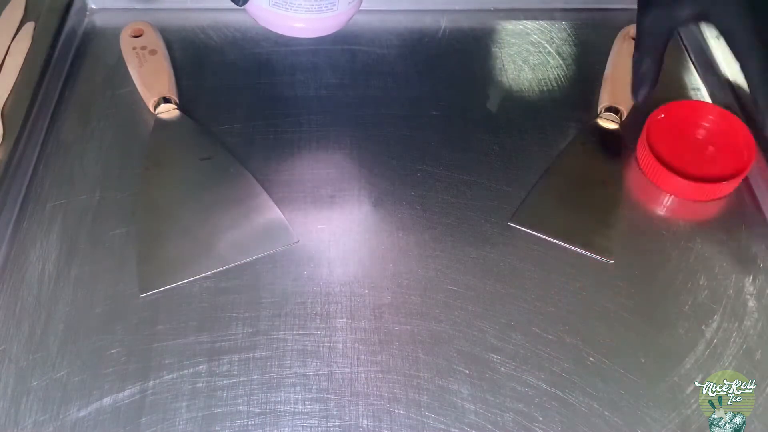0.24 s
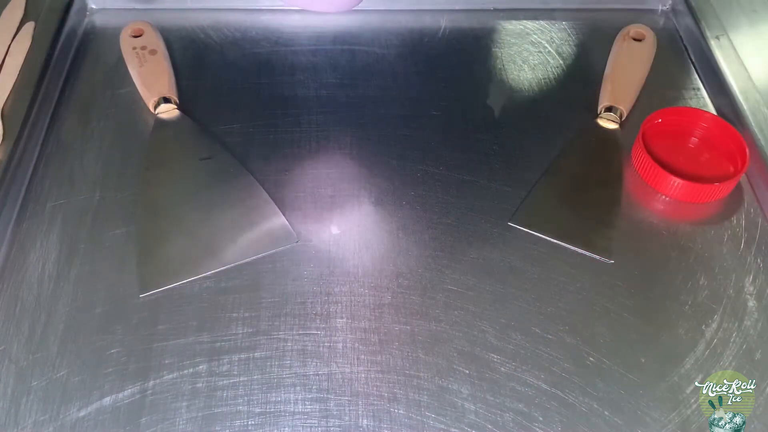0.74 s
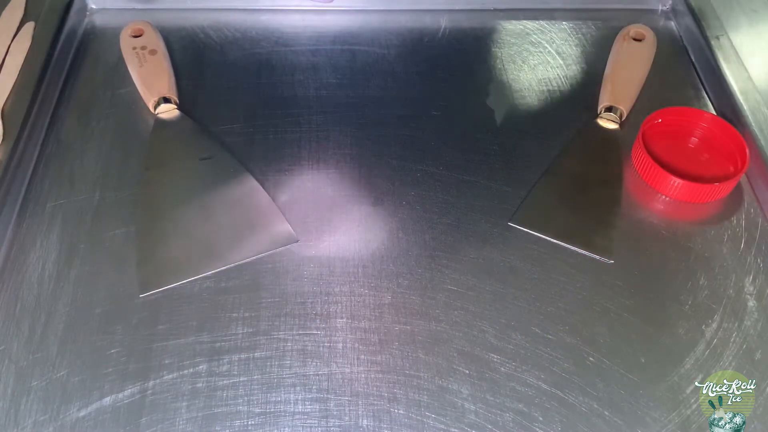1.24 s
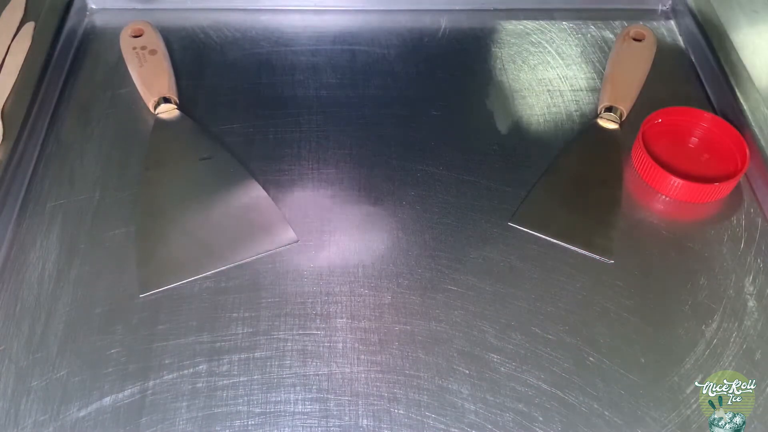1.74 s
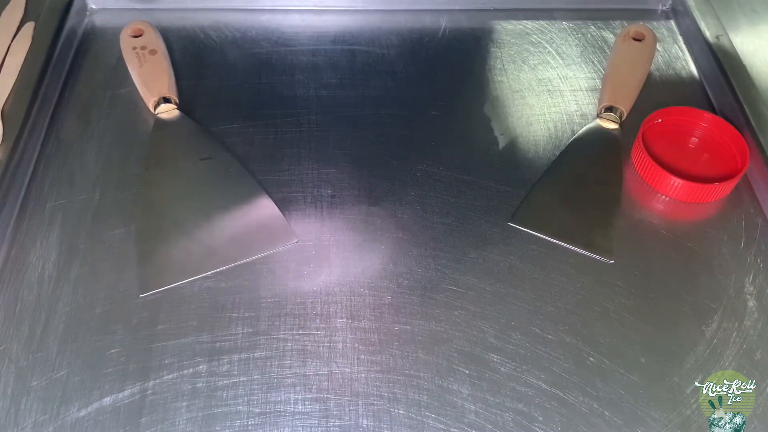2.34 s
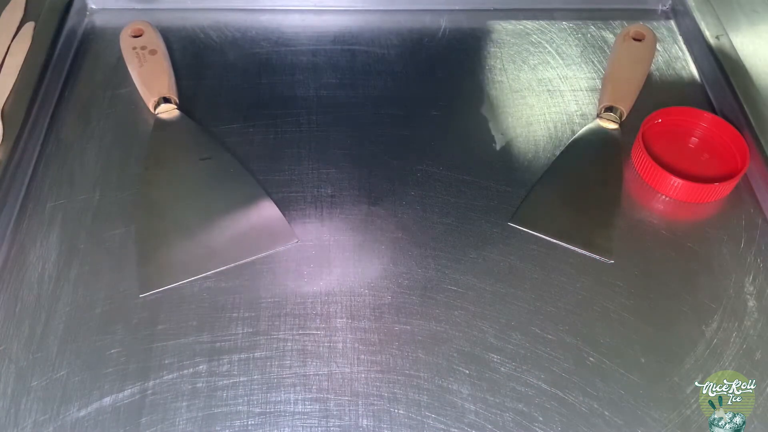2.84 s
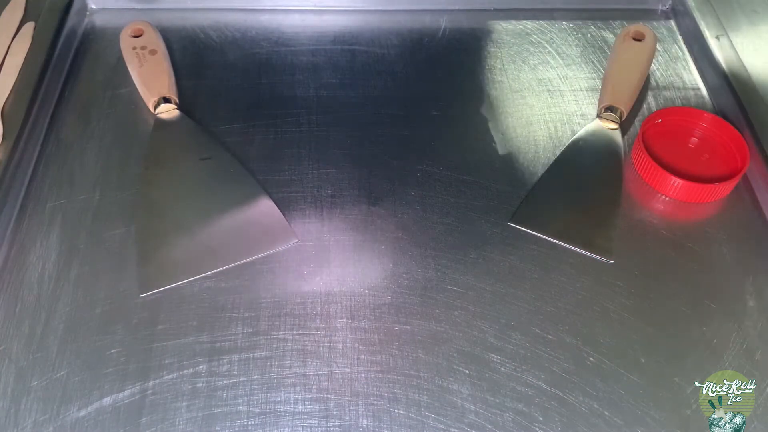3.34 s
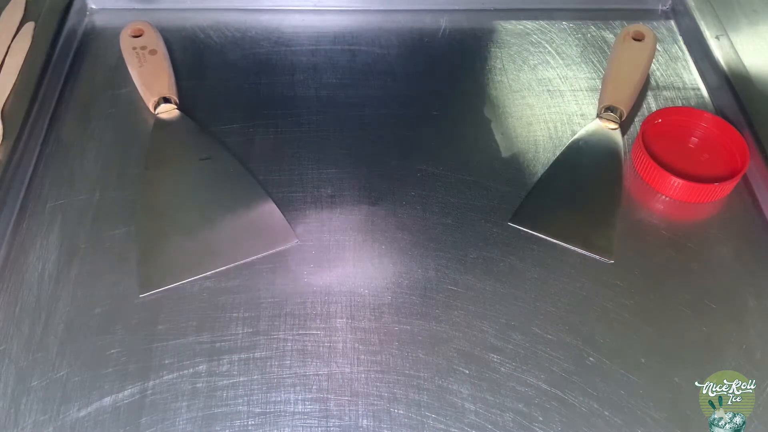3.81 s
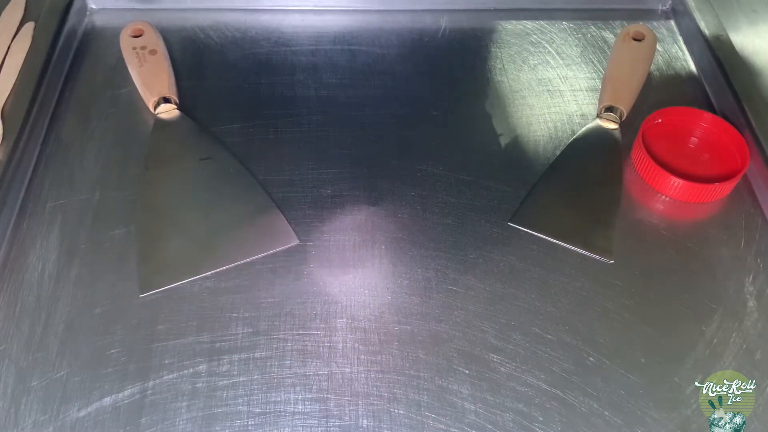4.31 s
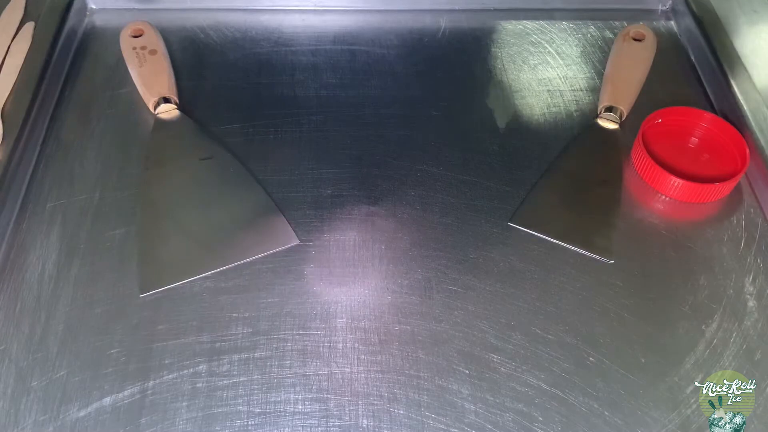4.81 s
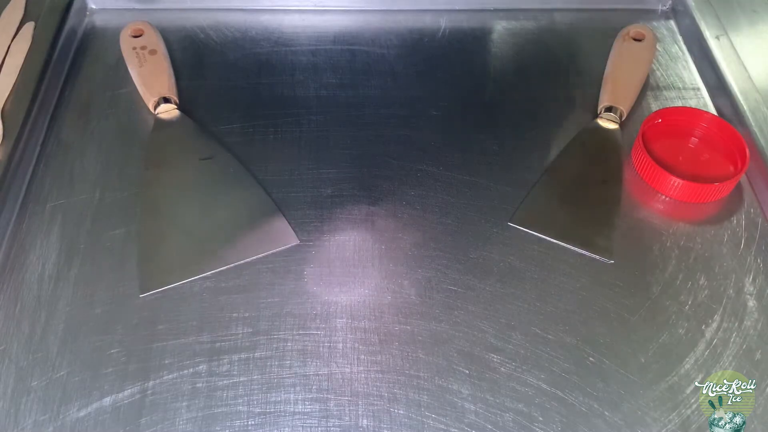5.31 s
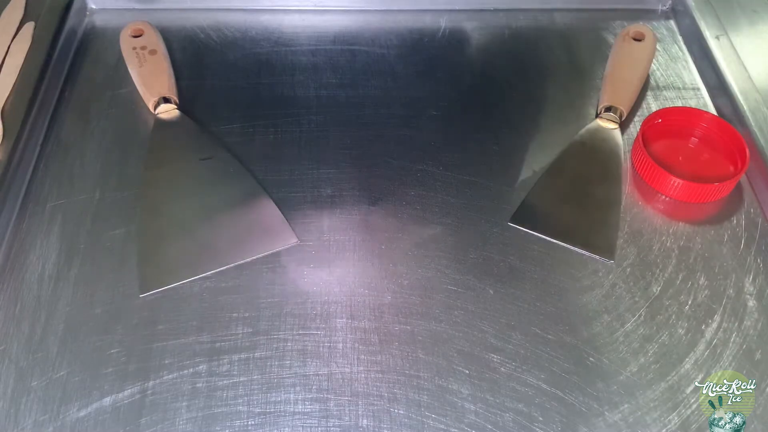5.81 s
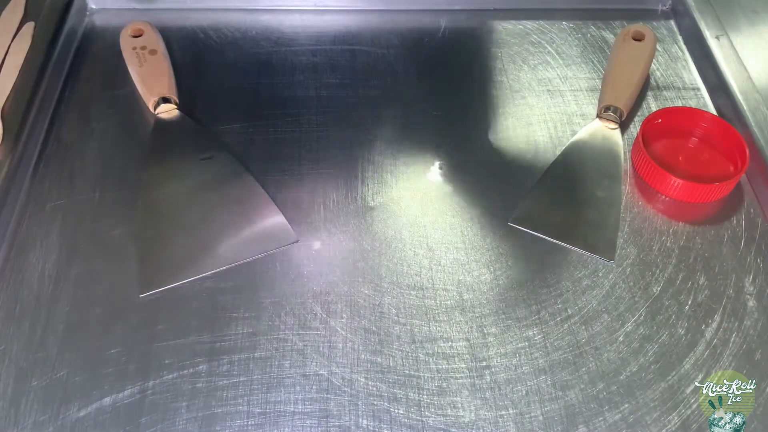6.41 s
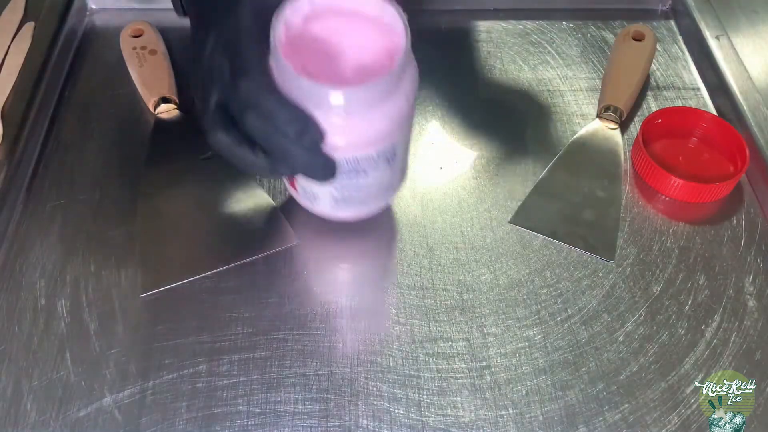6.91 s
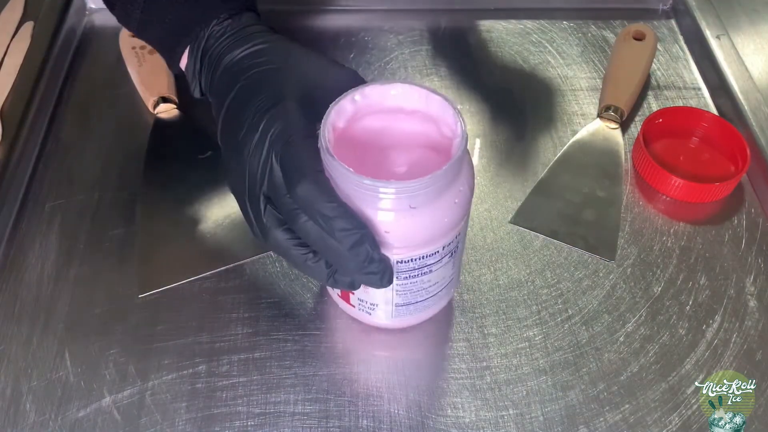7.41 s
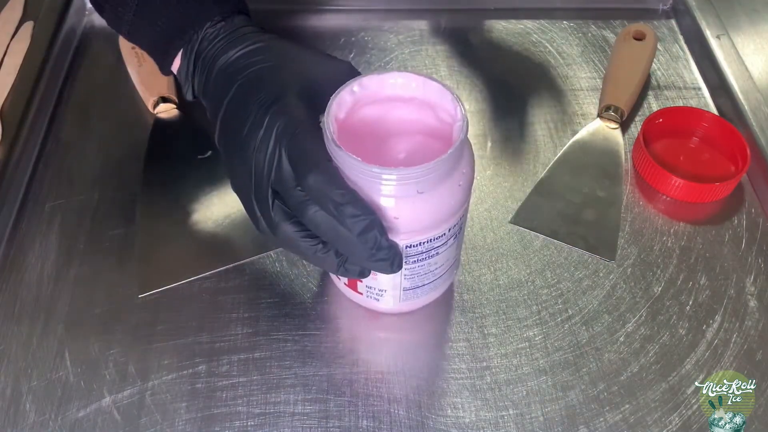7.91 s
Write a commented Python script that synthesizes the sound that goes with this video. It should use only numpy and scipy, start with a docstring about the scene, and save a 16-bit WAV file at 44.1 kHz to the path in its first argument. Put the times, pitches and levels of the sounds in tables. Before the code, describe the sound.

A plastic lid lands on a steel plate with a sharp clack and quick second bounce. After a short pause, a glued seal is peeled from a filled jar: sticky ticks, pops and crackly tearing grow denser, then turn into thin foil crumpling. The jar is set down with a dull knock and low steel boom. Small hard room, close stereo microphones, faint rumble and hiss.

```python
"""A sticky seal is peeled off a jar: bursts of tiny slips and clumped clicks excite damped resonances of
seal, wall, enclosed air and filling. A gloved finger creaks on the rim and the jar is set down on steel.
Before the peeling, a plastic lid drops on the steel plate: filtered noise bursts ring its modes and the plate's.
A small hard room answers with sparse decaying echoes over shaped background noise; two close microphones listen."""
import sys
import numpy as np
from scipy import signal
from scipy.fft import rfft, irfft
from scipy.io import wavfile
from scipy.ndimage import uniform_filter1d, map_coordinates

SR = 44100
rng = np.random.default_rng(int(sys.argv[2]) if len(sys.argv) > 2 else 0)


def pcm_store(signal):
    """Save signal as 16-bit PCM."""
    levels = np.round(np.clip(np.atleast_2d(signal), -1, 1) * 32767)
    wavfile.write(sys.argv[1], SR, levels.astype(np.int16).T)


N = 359415

# Snaps of seal and jar. Each row: start in seconds, seal peak in dB, wall level in dB, cavity level in dB,
# wall pitch in Hz, cavity pitch in Hz.
SNAPS = [(0.5866, -38.5, -51, -51.5, 1530, 1070), (1.0909, -49, -56, -51, 1670, 1032),
         (1.27, -46.5, -46.5, -41.5, 1550, 861), (1.2835, -35, -52, -37, 1820, 826),
         (1.3428, -30, -37, -38, 1590, 937), (1.3982, -26.5, -36, -36.5, 1550, 900),
         (1.4484, -57, -58, -50, 1770, 705), (1.5045, -40, -57, -74, 1960, 956),
         (1.5144, -59, -48, -48.5, 3780, 760), (1.5964, -47, -44.5, -52.5, 1840, 940),
         (1.6482, -34.5, -43, -51, 2000, 920), (1.9101, -47.5, -45, -54, 2360, 776),
         (1.934, -36, -50.5, -65, 2040, 820), (1.9535, -33, -48, -54.5, 3970, 880),
         (2.0053, -47, -45, -56, 2420, 900), (2.0814, -40, -46, -31, 3400, 920),
         (2.0892, -30.5, -37, -38.5, 1570, 880), (2.1124, -40, -54, -56, 2020, 890),
         (2.1425, -40, -48, -49, 2070, 929), (2.1929, -42, -49.5, -44, 1750, 750),
         (2.2463, -47, -45, -49, 4000, 870), (2.2887, -43, -49, -56, 4000, 934),
         (2.3144, -72, -50.5, -45, 1500, 1135), (2.3444, -30.5, -26.5, -28.5, 1550, 1453),
         (2.3955, -36, -38.5, -42, 1500, 915), (2.4074, -26.5, -36.5, -47, 2100, 1080),
         (2.4584, -43, -49, -47, 2040, 931), (2.4748, -34, -44, -47, 1990, 940),
         (2.6339, -49, -57, -60, 3310, 703), (2.7274, -62, -58.5, -64, 1990, 700),
         (2.7964, -70, -62.5, -46, 1750, 886), (2.8184, -56.5, -52, -59, 2340, 860),
         (2.8704, -68, -49, -47, 1950, 905), (2.8818, -36, -43, -49, 1970, 915),
         (2.9024, -42, -67, -45, 2370, 950), (2.9407, -25, -38.5, -36, 2100, 743),
         (3.0131, -34, -41.5, -43, 1890, 960), (3.0664, -46, -41, -45, 1910, 1070),
         (3.0729, -39, -36.5, -45, 1950, 760), (3.1124, -53, -44, -40.5, 1600, 760),
         (3.2324, -74, -59, -52.5, 1970, 1200), (3.2894, -40, -51, -45, 2430, 904),
         (3.3079, -31.5, -38.5, -41, 2000, 1195), (3.3837, -46, -47, -55, 1700, 1120),
         (3.4067, -40, -49.5, -46, 1920, 930), (3.4256, -39.5, -42, -43, 1940, 1114),
         (3.4645, -33, -45, -45.5, 1860, 929), (3.5538, -40.5, -39, -39.5, 2240, 827),
         (3.6134, -70, -65, -56.5, 4200, 920), (3.6874, -63, -66, -48.5, 2240, 990),
         (3.7035, -27.5, -35, -40, 2070, 1090), (3.7344, -21, -34.5, -29.5, 2000, 774),
         (3.7748, -24.5, -51, -34, 2010, 890), (3.8214, -35.5, -47, -48, 4300, 1030),
         (3.8876, -25.5, -39, -36, 1890, 760), (3.9165, -23, -36.5, -27.5, 1980, 850),
         (3.9689, -19, -40, -30.5, 2000, 1040), (4.0114, -31, -41.5, -33.5, 1860, 940),
         (4.0372, -34, -45, -56, 1900, 890), (4.0557, -28.5, -41.5, -34.5, 1590, 1150),
         (4.1081, -26.5, -38, -35.5, 2030, 1010), (4.1464, -37, -41, -36, 1770, 900),
         (4.155, -24.5, -43, -57, 1700, 988), (4.1759, -21.5, -36, -33.5, 1700, 810),
         (4.1944, -21, -38, -40, 1980, 950), (4.2383, -22.5, -55, -39, 4520, 1260),
         (4.3184, -63, -72, -44.5, 1730, 620), (4.345, -43, -45.5, -66, 2050, 1080),
         (4.3774, -30, -43, -58, 2300, 980), (4.3979, -22, -32.5, -37.5, 2080, 1120),
         (4.5221, -57, -54, -84, 2060, 990), (4.5404, -39, -41.5, -49.5, 1950, 830),
         (4.5501, -29.5, -45, -43, 2040, 1090), (4.565, -25.5, -45, -61, 2630, 1080),
         (4.5864, -24, -44, -53, 2370, 1070), (4.5944, -33, -64, -70, 1920, 1110),
         (4.6244, -27, -48, -52, 4500, 920), (4.6394, -23.5, -38, -56, 2010, 970),
         (4.6688, -25, -49, -40, 2420, 960), (4.6803, -21.5, -35, -48, 4270, 910),
         (4.7252, -29, -50.5, -66, 3120, 1150), (4.7696, -36, -49, -54, 4100, 1170),
         (4.8534, -44.5, -67, -58.5, 1450, 1250), (4.8688, -50, -66, -71, 3340, 1120),
         (4.9207, -36, -46, -57, 1880, 985), (5.0175, -38, -59.5, -84.5, 4090, 1490),
         (5.1163, -24.5, -39, -62.5, 2430, 1150), (5.1534, -47, -45.5, -67, 2420, 990),
         (5.2016, -29, -38.5, -80, 1930, 1450), (5.2574, -39, -36.5, -61, 2230, 1000),
         (5.3502, -23.5, -43.5, -76, 2470, 1440), (5.3794, -43, -46, -77, 4700, 1380),
         (5.4051, -22, -39, -56, 4530, 1470), (5.4944, -24.5, -36.5, -58.5, 2030, 990),
         (5.5248, -29, -58, -64, 4500, 704), (5.5467, -26.5, -56, -73, 2140, 1290),
         (5.5563, -29.5, -57, -70, 2100, 1310), (5.6007, -26, -51, -55.5, 4500, 1050),
         (5.6406, -41, -42, -56.5, 3700, 990), (5.7284, -32, -62, -72, 4460, 1450),
         (5.7443, -26, -58, -61, 1920, 1460), (5.7718, -23, -39, -53.5, 2060, 1150),
         (5.7882, -24, -42.5, -69, 2170, 1370), (5.8212, -25, -53, -72, 3240, 1250),
         (5.8646, -23, -53, -73, 3210, 1370), (5.9793, -43, -46.5, -64, 1960, 1420),
         (6.0172, -25, -47, -75, 2600, 1090), (6.0257, -30.5, -49, -61, 4350, 1270),
         (6.0524, -39, -41.5, -70, 4000, 1180), (6.0761, -30, -41, -57, 2330, 1380),
         (6.0924, -28, -58, -62, 2460, 1070), (6.1, -19, -39, -62, 3670, 1100),
         (6.1384, -27, -38.5, -51, 2580, 960), (6.1454, -28, -53, -54, 4490, 1250),
         (6.1974, -40, -52, -69, 3710, 1310), (6.2163, -40, -50, -63, 2150, 1190),
         (6.3804, -58, -52.5, -66, 3280, 1290), (6.4154, -52, -46, -63, 3740, 1220),
         (6.4612, -39, -36.5, -54, 3080, 1330), (6.4774, -38, -43.5, -49, 3570, 1450),
         (6.561, -34.5, -57.5, -86, 2700, 1150), (6.5894, -57, -53, -76, 3740, 1450),
         (6.6228, -36, -55, -87.5, 4470, 977), (6.7274, -66.5, -55, -88, 4540, 622),
         (6.771, -36, -50, -90, 2500, 820), (6.8034, -29, -54.5, -97, 4130, 1070),
         (6.8828, -31.5, -49, -85, 4600, 610), (6.9267, -26.5, -59.5, -80, 4380, 1470),
         (7.016, -33, -56, -84.5, 3930, 1360), (7.0349, -24.5, -73, -75, 4470, 899),
         (7.3672, -29, -73.5, -85, 2920, 1350), (7.6211, -33, -49, -83, 2420, 937),
         (7.6879, -34, -47.5, -71, 4260, 1430), (7.7054, -51, -49, -57.5, 4250, 1300),
         (7.9224, -33, -61, -74, 3370, 668), (8.0202, -41, -80, -81, 4370, 1440),
         (8.1354, -35, -45.5, -83, 1970, 1450)]
# Resonances of the filled jar, the air over the filling, the jar wall and the foil seal.
# Each row: frequency in Hz, width in Hz, relative level in dB.
FILLING_MODES = [(240, 41, -11), (434, 100, 3.5)]
AIR_MODES = [(724, 74, 0.5), (929, 47, 5), (1070, 230, 4)]
WALL_MODES = [(1550, 280, -5), (1950, 190, -5), (2200, 180, 2), (3240, 1100, -4), (4000, 280, -0.5),
              (4890, 270, -2.5)]
SEAL_MODES = [(5283, 2300, -4), (6810, 2500, 3.5), (9250, 5300, 3), (11920, 2300, 3.5), (14000, 5000, -7.5)]
CREST_DB = 6  # peak of wall and cavity over their level
SLIP_DECAY_MS = 4.16  # mean over the snaps
FILLING_UNDER_AIR_DB = 21  # what shakes the air shakes the filled jar too


def snaps():
    """Stick-slip excitation of resonators: each burst of slips strikes the seal at once and swells in the air."""
    out = np.zeros(N)
    t_ms = np.arange(1024) / SR * 1000
    slips = rng.standard_normal((len(SNAPS), 1024))
    lengths = .5 + rng.random(len(SNAPS))
    filling, seal = ring(FILLING_MODES), ring(SEAL_MODES, size=256)
    for row, slip, length in zip(SNAPS, slips, lengths):
        s, seal_db, wall_db, air_db, wall_hz, air_hz = row
        ms = SLIP_DECAY_MS * length
        fall = np.exp(-t_ms / .4) + .3 * np.exp(-t_ms / max(ms, .2))
        sharp = slip * fall * (1 - np.exp(-t_ms / .15))
        soft = slip * t_ms * np.exp(-t_ms / max(0.31 * ms, .2))
        air = ring([(air_hz, 100, 12)] + AIR_MODES, size=1024)  # the gap in the seal sets the pitch
        wall = ring([(wall_hz, 0.062 * wall_hz, 7)] + WALL_MODES, size=1024)  # the grip favours one mode
        air_peak_db = air_db + CREST_DB
        parts = [(soft, filling, air_peak_db - FILLING_UNDER_AIR_DB), (soft, air, air_peak_db),
                 (sharp, wall, wall_db + CREST_DB), (sharp, seal, seal_db)]
        for burst, body, db in parts:
            add(out, s, amp(db) * peaked(signal.fftconvolve(burst, body)))
    return out


# Slow pull on the glue between the snaps. Each row: time in seconds, seal level in dB, cavity level in dB.
PULL = [(1.2, -89, -101), (1.31, -101, -100), (1.47, -78, -77), (1.78, -82, -68), (2.34, -89, -71),
        (2.55, -81, -74), (2.82, -91, -87), (3.0, -72, -68.5), (3.33, -90, -80.5), (3.75, -92, -65),
        (3.91, -56, -59.5), (4.08, -61, -66.5), (4.37, -90, -59), (4.61, -66, -81), (4.78, -81, -69),
        (4.95, -112, -88), (5.15, -60, -92), (5.28, -64, -67), (5.69, -67, -134), (6.31, -59.5, -75.5),
        (6.56, -68, -101), (6.83, -66.5, -101), (6.99, -57.5, -75), (7.2, -62.5, -94), (7.45, -64, -86),
        (8.15, -59, -89)]
# Pulls that tear the seal in a rush. Each row: middle in seconds, half length in ms, seal level in dB,
# cavity level in dB.
TEARS = [(1.287, 29, -53, -45.5), (1.347, 23.7, -50, -44.5), (1.778, 90, -57, -55.5), (1.913, 25, -65, -63),
         (2.02, 61, -69, -60), (2.15, 127, -65, -58), (2.371, 37, -47.5, -49.5), (2.417, 16, -48, -49.5),
         (2.481, 69, -60.5, -60.5), (2.902, 46, -62, -55), (3.03, 38, -59, -58), (3.081, 40, -49.5, -45.5),
         (3.124, 8.8, -68, -58), (3.329, 45, -71, -67), (3.43, 62, -60.5, -71), (3.757, 54, -46, -43),
         (3.931, 18, -51, -51), (3.971, 14, -48, -41), (4.071, 14, -60, -48), (4.199, 38, -47, -46.5),
         (4.242, 12.5, -54, -41.5), (4.406, 12, -43, -53), (4.59, 24, -48, -61), (4.674, 32, -40.5, -43.5),
         (5.211, 24, -48, -83.5), (5.26, 29, -42, -56), (5.357, 91, -51.5, -92), (5.611, 106, -47.5, -66),
         (5.66, 47, -38.5, -74), (5.782, 117, -53.5, -76), (5.867, 52, -40.5, -65),
         (6.031, 75, -52.5, -68.5), (6.108, 103, -45, -70), (6.2, 150, -61, -88), (6.42, 41, -54.5, -64.5),
         (6.468, 38, -43, -69), (6.939, 31, -46.5, -71.5), (7.04, 25, -69, -97), (7.131, 29, -56, -93),
         (7.26, 100, -58.5, -82), (7.382, 122, -58.5, -98), (7.706, 18, -47, -87), (7.856, 27, -57.5, -100),
         (8.031, 35, -60.5, -83)]
WALL_UNDER_SEAL_DB, WALL_UNDER_AIR_DB = 6.0, 4.5  # what shakes seal or air shakes the wall too
LOOSE_S, LOOSE_WALL_DB, CRUMPLE_DB = 6.05, 4, -6.5  # seal comes off; drop of wall drive; crumple re seal drive


def pull_forces():
    """Coupled excitation: the pull drives seal and air, which pass it on to wall, filling and crumpling foil."""
    seconds = np.arange(N) / SR
    s, *levels = np.transpose(PULL)
    pull = np.array([amp(np.interp(seconds, s, db, -120)) for db in levels])
    for middle, ms, *db in TEARS:
        swell = np.hanning(int(ms * SR / 500))
        add(pull, middle - ms / 1000, amp(db)[:, None] * swell)
    seal, air = pull
    filling = air / amp(FILLING_UNDER_AIR_DB)
    wall = np.hypot(seal / amp(WALL_UNDER_SEAL_DB), air / amp(WALL_UNDER_AIR_DB))
    loose = np.clip((seconds - LOOSE_S) / .5, 0, 1)  # the freed seal crumples in the hand
    wall = wall * (1 - loose * (1 - amp(-LOOSE_WALL_DB)))
    crumple = seal * loose * amp(CRUMPLE_DB)
    return filling, air, wall, seal, crumple


# Resonances of the loose foil. Each row: frequency in Hz, width in Hz, relative level in dB.
CRUMPLE_MODES = [(2860, 200, 1.5), (3280, 250, 2), (4520, 170, 5.5), (4980, 480, -1.5)]
# Factors on all crackle resonances as the hand squeezes the jar.
GRIPS = (.87, 0.948, 1.028, 1.118)
# Spread of click sizes in filling, air, wall, seal and crumpled seal, in dB per unit of an exponential draw.
SPREAD_DB = (2.0, 2.5, 1.8, 8.4, 3.7)


def crackle():
    """Random impulse excitation: clumped clicks of glue letting go, a few large, ring bodies retuned by the grip."""
    out = np.zeros(N)
    clumps = amp(2.5 * evened(uniform_filter1d(rng.standard_normal(N), 300)))
    bodies = (FILLING_MODES, AIR_MODES, WALL_MODES, SEAL_MODES, CRUMPLE_MODES)
    clicks_per_s = (500, 1200, 5000, 9000, 2500)
    for force, modes, per_s, spread_db in zip(pull_forces(), bodies, clicks_per_s, SPREAD_DB):
        struck = rng.random(N) < per_s / SR
        size = amp(spread_db * np.minimum(rng.exponential(1, N), 4))
        clicks = force * evened(struck * rng.standard_normal(N) * size * clumps)
        wander = uniform_filter1d(rng.standard_normal((len(GRIPS), N)), 900)
        grip = wander.argmax(0)  # changes every few hundredths of a second
        for k, factor in enumerate(GRIPS):
            body = ring([(hz * factor, w, db) for hz, w, db in modes])
            out += signal.oaconvolve(clicks * (grip == k), body / np.linalg.norm(body))[:N]
    return out


# Fingers bump the filled jar. Each row: start in seconds, peak in dB.
BUMPS = [(1.271, -47), (1.284, -41), (1.342, -45), (1.396, -40), (2.089, -65), (2.113, -46), (2.192, -46.5),
         (2.247, -49), (2.796, -51.5), (2.885, -50), (2.941, -31), (3.064, -41), (3.234, -52.5),
         (3.706, -39), (3.777, -26.5), (3.915, -76), (4.176, -42.5), (4.196, -36), (4.234, -40.5),
         (4.377, -50), (4.399, -40.5), (4.681, -44), (5.258, -48), (5.601, -45.5), (5.771, -56.5),
         (6.016, -57), (7.621, -65)]
# The whole jar yields under a finger. One row: frequency in Hz, width in Hz, relative level in dB.
YIELD_MODE = (159, 25, -19.5)


def finger_bumps():
    """Soft impact: a noise burst that swells and fades rings the low resonances of the filled jar."""
    out = np.zeros(N)
    t_ms = np.arange(1024) / SR * 1000
    body = ring(FILLING_MODES + [YIELD_MODE])
    for (s, db), slip in zip(BUMPS, rng.standard_normal((len(BUMPS), 1024))):
        add(out, s, amp(db) * peaked(signal.fftconvolve(slip * t_ms * np.exp(-t_ms / 1.8), body)))
    return out


# Glove on the rim. Each row: time in seconds, level in dB.
RUB = [(1.555, -70), (1.568, -54), (1.65, -58), (1.72, -52), (1.78, -47.5), (1.84, -66), (1.88, -88)]
# Resonances of the rim. Each row: frequency in Hz, width in Hz, relative level in dB.
RIM_MODES = [(900, 360, -2), (1560, 300, -2), (2000, 200, -2), (2320, 120, 4), (3520, 150, -4),
             (4150, 290, -2.5)]


def rub():
    """Friction: a steady stream of slips, modelled as noise, sounds the fixed resonances of the rim."""
    s, db = np.transpose(RUB)
    body = ring(RIM_MODES)
    slips = rng.standard_normal(N) * amp(np.interp(np.arange(N) / SR, s, db, -120, -120))
    return signal.oaconvolve(slips, body / np.linalg.norm(body))[:N]


# Jar base on steel: start in seconds, peak in dB.
KNOCK = (7.497, -28.5)
# Resonances of the jar base. Each row: frequency in Hz, width in Hz, relative level in dB.
BASE_MODES = [(480, 180, -7), (825, 150, -4.5), (1250, 750, -10.5), (1650, 160, 2), (1950, 190, -2)]
# Pushes on the plate, which rocks after the lid lands and booms under the jar.
# Each row: start in seconds, peak in dB, half contact time in ms.
PUSHES = [(.39, -45.5, 7.4), (0.501, -52.5, 9), (.59, -56.5, 7.8), (7.497, -27.5, 2.1), (8.03, -54.5, 0.67)]
# Low modes of the steel plate. Each row: frequency in Hz, level in dB, time to fall 60 dB in seconds.
PLATE_MODES = [(52, -12.5, 0.27), (66, -15, 0.37), (93, -16, .5), (105.7, -2, .6), (133, -2, 0.48),
               (129.8, -8.5, 0.3), (134, 2.5, .6), (148.4, -6.5, 0.38), (150, -6.5, 0.38), (188, -5.5, 0.3),
               (216, -9, .4), (258, -4, 0.51), (300, -13.5, 0.47)]


def set_down():
    """Contact time as a low-pass: soft pushes ring only low plate modes and shake on; the jar base knocks once."""
    low, knock = np.zeros(N), np.zeros(N)
    t = np.arange(6000) / SR
    shakes = rng.standard_normal((len(PUSHES), 6000)) * .015 * np.exp(-t / .04)
    for (s, db, ms), shake in zip(PUSHES, shakes):
        push = signal.fftconvolve((t == 0) + shake, np.hanning(int(ms * SR / 500)))
        add(low, s, amp(db) * peaked(signal.fftconvolve(chime(PLATE_MODES), push)))
    s, db = KNOCK
    add(knock, s, amp(db) * ring(BASE_MODES))
    return knock, low


# Lid on steel. Each row: start in seconds, peak in dB, plate ring in dB relative to that peak,
# hardness as a cut-off in Hz, rattle decay in ms.
LID_BLOWS = [(0.031, -31, -42, 1750, 2.7), (0.2428, -6.5, -33.5, 12180, 1.8),
             (0.2484, -15.5, -30, 5000, 0.99), (.255, -23.5, -43.5, 7000, 2.2),
             (0.3083, -28, -37.5, 2500, 1.7), (0.3124, -14.5, -24, 12000, 0.4),
             (.317, -14.5, -44.5, 2636, 3)]
# Resonances of the lid and of its edge. Each row: frequency in Hz, width in Hz, relative level in dB.
LID_MODES = [(362, 120, -6.5), (475, 270, -9), (932, 57, 1.5), (1050, 74, -3), (1510, 250, -9),
             (1850, 250, -8), (2110, 110, -3), (2443, 130, -3), (2870, 200, -4.5), (2997, 220, -3.5),
             (3500, 560, -5), (4160, 780, -3), (4400, 100, 2), (4680, 300, -10.5), (5600, 960, -11),
             (6450, 300, -7.5), (7200, 600, -4), (8120, 550, -6.5), (10700, 780, -12.5),
             (13000, 3000, -14.5)]
EDGE_MODES = [(4500, 2700, -4), (6300, 900, 2.5), (7760, 580, -5.5), (9900, 790, 1.5)]
# Short noise swell just before the main lid blow: end in seconds, growth time in ms, peak in dB.
LID_SWELL = (.2435, 5.8, -28.5)
STEEL_DB, STEEL_T60_S, STEEL_HZ = -12.5, 0.25, 1500  # shimmer after each blow: level, 60 dB fall, cut-off


def lid():
    """Impact and modal response: harder blows pass more treble to the lid; each also starts the plate's low ring."""
    out, low = np.zeros(N), np.zeros(N)
    t = np.arange(3000) / SR
    rattles = rng.standard_normal((len(LID_BLOWS) + 1, 3000))
    body, edge = ring(LID_MODES, size=4096), ring(EDGE_MODES, size=256)
    boom = peaked(signal.fftconvolve(chime(PLATE_MODES), np.hanning(200)))
    for (s, db, plate_db, hz, ms), rattle in zip(LID_BLOWS, rattles):
        hardness = signal.butter(2, min(hz, 20000), fs=SR, output="sos")
        fall = np.exp(-t * 1000 / ms) + 3.7 * np.exp(-t / 0.00017)
        blow = signal.sosfilt(hardness, rattle * fall)
        add(out, s, amp(db) * peaked(signal.fftconvolve(blow, body)))
        crack = peaked(signal.fftconvolve(rattle * np.exp(-t / 0.00056), edge))
        add(out, s, amp(db + 1.5 + 30 * np.log10(hz / 12000)) * crack)  # a hard contact cracks
        add(low, s, amp(db + plate_db) * boom)
    # countless close modes of the steel
    dense = rng.standard_normal(16000) * amp(-60 * np.arange(16000) / SR / STEEL_T60_S)
    dense = signal.sosfilt(signal.butter(2, STEEL_HZ, "high", fs=SR, output="sos"), dense)
    out += amp(STEEL_DB) * signal.oaconvolve(out, dense / np.linalg.norm(dense))[:N]
    end, ms, db = LID_SWELL
    swell = rattles[-1] * np.exp(-t[::-1] * 1000 / ms)
    add(out, end - t[-1], amp(db) * peaked(signal.fftconvolve(swell, body)))
    return out, low


# Decay of the room. Each row: frequency in Hz, time to fall 60 dB in seconds.
ROOM = [(100, 0.17), (500, 0.26), (1500, 0.13), (4000, 0.16), (8000, 0.11), (14000, 0.082)]
# Colour of the room over the direct sound. Each row: frequency in Hz, relative level in dB.
WET = [(200, -4), (800, -4.5), (1500, 1.5), (4000, 0.5), (6000, 4), (9000, -1.5), (15000, -0.5)]


def room(x, wet_db):
    """Reverberation: three random sparse tails take turns in a steady cycle, which smooths the echo's colour."""
    out = np.zeros((2, N))
    turn = 2 * np.pi * 2.3 * np.arange(N) / SR
    for k in range(3):
        taps = np.zeros((2, SR // 2))  # other taps for each ear
        at = np.arange(60, SR // 2 - 20, 20)
        at = at + rng.integers(0, 20, (2, len(at)))
        np.put_along_axis(taps, at, rng.choice([-1., 1.], at.shape), 1)
        hz, t, z = signal.stft(taps, SR, nperseg=256)
        decay = amp(-60 * t / read(ROOM, hz)[:, None])
        decay = decay / np.linalg.norm(decay, axis=1, keepdims=True)
        decay = decay * amp(read(WET, hz))[:, None]
        tail = signal.istft(z * decay, SR, nperseg=256)[1] / 1.8
        part = x * np.sqrt(2 / 3) * np.cos(turn + 2 * np.pi * k / 3)
        out += signal.oaconvolve(part[None], tail, axes=1)[:, :N]
    return amp(wet_db) * out


# Spectrum of the background. Each row: frequency in Hz, relative density in dB per Hz.
HUSH = [(15, -45.5), (25, -0.5), (48, -2), (87, -11.5), (137, -9), (206, -15), (263, -12.5), (344, -17),
        (607, -18.5), (818, -23), (6920, -37), (9320, -33), (16000, -65.5)]
# Coherence of the background. Each row: frequency in Hz, left-right likeness from -1 to 1.
SAME = [(60, 0.7), (240, 0.66), (950, -0.4), (3770, 0.48), (15000, 0.04)]
HUSH_DB = -69.5  # rms level before the microphones


def hush():
    """Partly coherent noise: rumble and hiss of the room, with bands that swell and sink."""
    frames, hz = N // 256 + 5, np.fft.rfftfreq(1024, 1 / SR)
    a, b, c, d, patches = rng.standard_normal((frames, 513, 5)).T
    patches = evened(uniform_filter1d(uniform_filter1d(patches, 10, 0), 30, 1))
    same = np.clip(read(SAME, hz), -1, 1)[:, None]
    left = a + 1j * b
    right = same * left + np.sqrt(1 - same ** 2) * (c + 1j * d)
    z = np.array([left, right]) * amp(read(HUSH, hz)[:, None] + 1.4 * patches)
    return amp(HUSH_DB) * evened(signal.istft(z, nperseg=1024, noverlap=768)[1][:, :N])


def ring(modes, size=2048):
    """Impulse response of damped modes, peak 1; a small body radiates little below its lowest mode."""
    t = np.arange(size) / SR
    x = np.zeros(size)
    for k, (hz, w, db) in enumerate(modes):
        x += (-1) ** k * amp(db) * w * np.exp(-np.pi * w * t) * np.sin(2 * np.pi * hz * t)
    lowest = min(hz for hz, w, db in modes)
    return peaked(signal.sosfilt(signal.butter(3, .7 * lowest, "high", fs=SR, output="sos"), x))


def chime(modes, size=30000):
    """Modal superposition: sines with long exponential decays answer one blow, peak 1."""
    t = np.arange(size) / SR
    x = np.zeros(size)
    for k, (hz, db, t60) in enumerate(modes):
        x += (-1) ** k * amp(db - 60 * t / t60) * np.sin(2 * np.pi * hz * t)
    return peaked(x)


def amp(db):
    """Logarithmic level: the amplitude gain of a level in dB."""
    return 10 ** (np.asarray(db) / 20)


def evened(x):
    """Power normalisation: scaled to rms 1."""
    return x / np.sqrt(np.mean(x ** 2) + 1e-20)


def peaked(x):
    """Peak normalisation: scaled to peak 1."""
    return x / abs(x).max()


def read(points, hz):
    """Logarithmic interpolation: a spectrum table read on a log frequency axis."""
    f, value = np.transpose(points)
    return np.interp(np.log(hz + 1), np.log(f + 1), value)


def add(mix, s, sound):
    """Superposition: a sound summed into the mix from a time in seconds."""
    part = mix[..., round(s * SR):][..., :sound.shape[-1]]
    part += sound[..., :part.shape[-1]]


# The jar moves to the middle. Each row: time in seconds, lead of the left capsule in samples.
LEAD = [(0, 6), (5.05, 4.18), (5.3, 0.71), (8.2, 0.95)]


def scene():
    """Stereo by arrival time and level: the jar is nearer the left capsule, the lid nearer the right."""
    top, plate = lid()
    knock, thump = set_down()
    jar = snaps() + finger_bumps() + crackle() + rub() + knock
    n = np.arange(N)
    late = map_coordinates(jar, [n - np.interp(n / SR, *np.transpose(LEAD))], order=3)
    left = amp(1.5) * jar + amp(-0.5) * np.roll(top, 2)
    right = late + amp(1.5) * top
    steel = plate + thump
    direct = np.array([left, right]) + steel * amp([[-.3], [.3]])
    echoes = room(jar + amp(-2.0) * top, -0.5) + room(steel, -13.0)
    return direct + echoes + hush()


# Treble common to both capsules. Each row: frequency in Hz, shared part before a cap of 0.93.
ALIKE = [(5500, 0.023), (7000, 0.68), (8500, 1), (10500, 1), (11600, 1), (14000, 0.7), (16000, .7)]
# Microphone colour. Each row: frequency in Hz, gain in dB.
MIC = [(20, -27), (45, -3), (100, -5), (12500, -2.5), (14000, 1), (15600, -2), (16200, -13.5)]
TREBLE_LEAD = 9.5  # samples by which the right capsule hears the shared treble first
EDGE_HZ = 16500  # band limit


def record(dry):
    """Coherence and linear filtering: the capsules share most treble, then come microphone colour and band limit."""
    left, right = rfft(dry[0]), rfft(dry[1])
    hz = np.fft.rfftfreq(N, 1 / SR)
    alike = np.clip(read(ALIKE, hz), 0, .93)
    early = left * np.exp(2j * np.pi * hz * TREBLE_LEAD / SR)
    right = np.sqrt(1 - alike ** 2) * right + alike * early
    pair = irfft(np.array([left, right]) * amp(read(MIC, hz)), N)
    edge = signal.firwin(511, EDGE_HZ, window=("kaiser", 9), fs=SR)
    return signal.oaconvolve(pair, edge[None], "same")


dry = scene()
out = record(dry)
pcm_store(out)
```